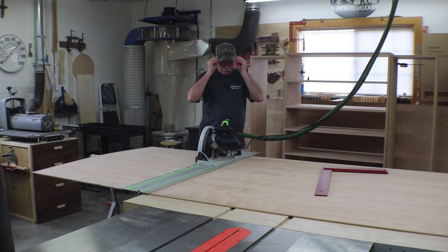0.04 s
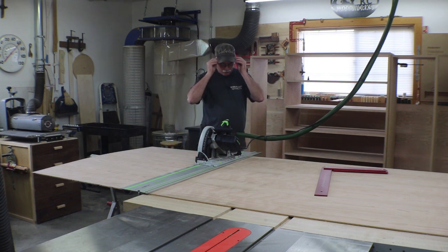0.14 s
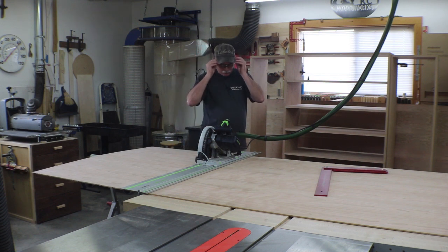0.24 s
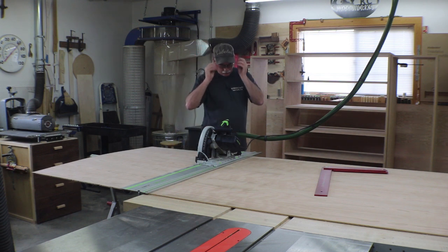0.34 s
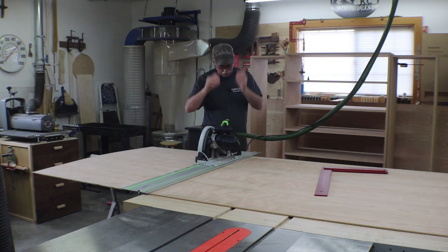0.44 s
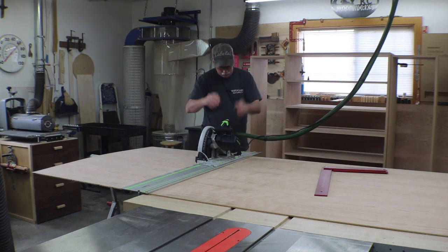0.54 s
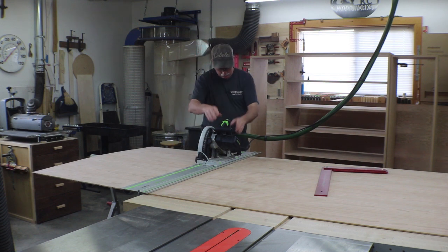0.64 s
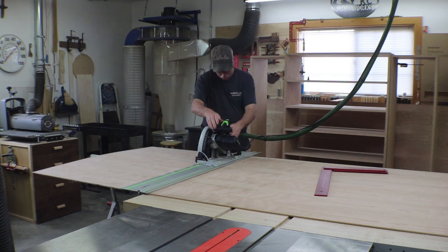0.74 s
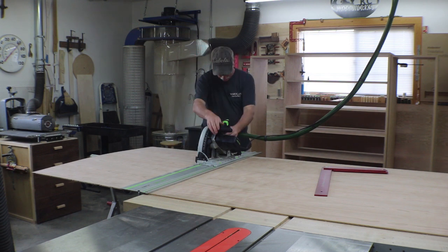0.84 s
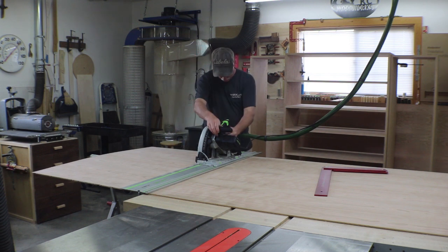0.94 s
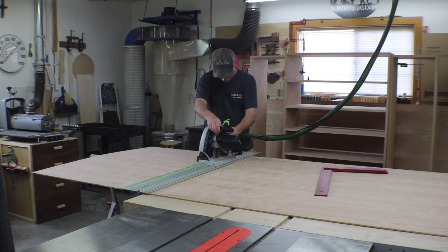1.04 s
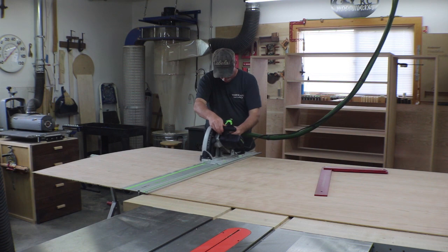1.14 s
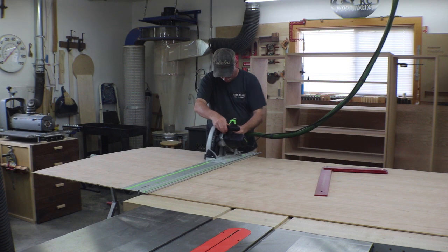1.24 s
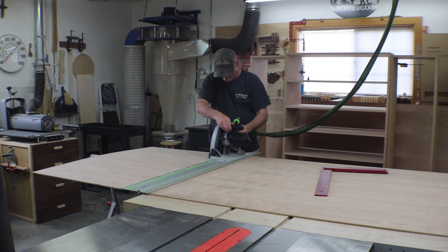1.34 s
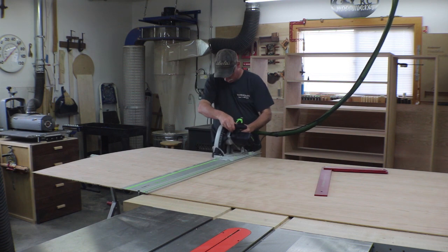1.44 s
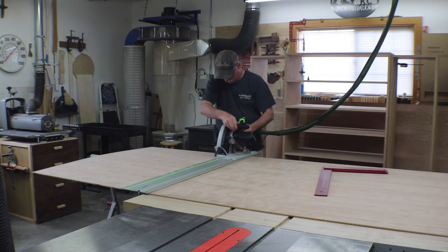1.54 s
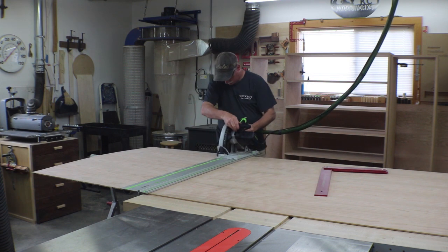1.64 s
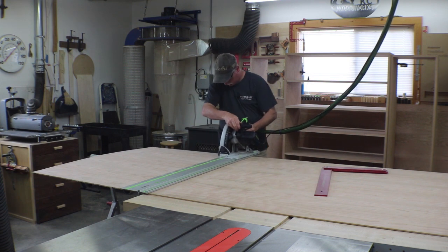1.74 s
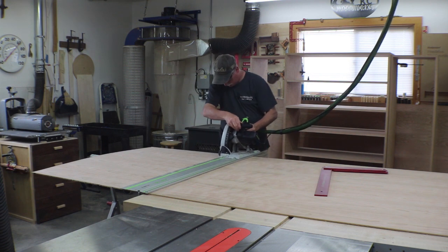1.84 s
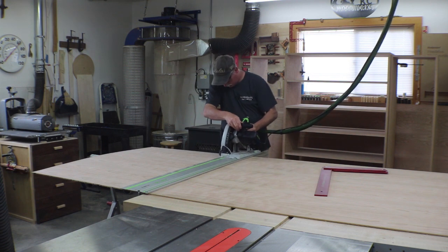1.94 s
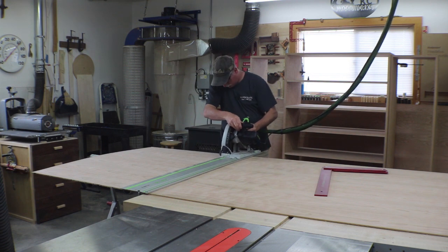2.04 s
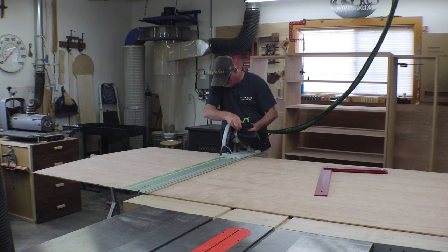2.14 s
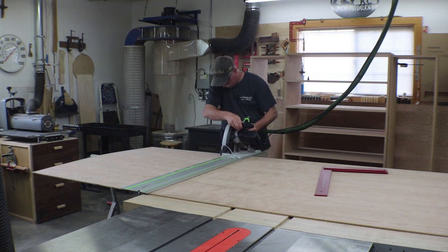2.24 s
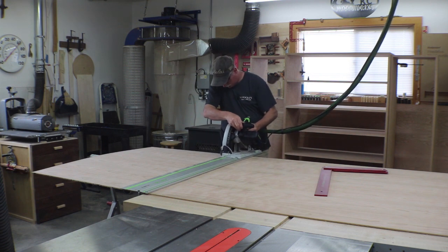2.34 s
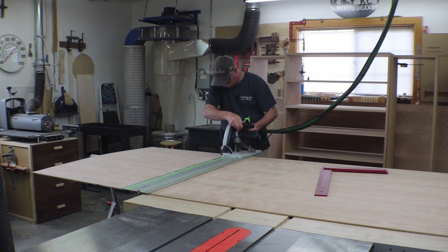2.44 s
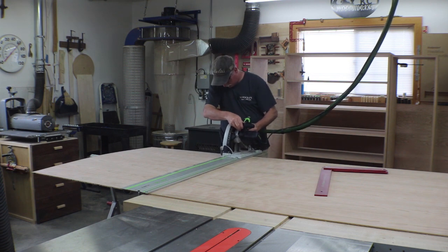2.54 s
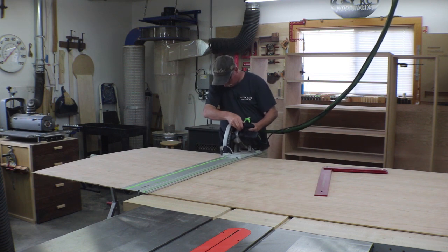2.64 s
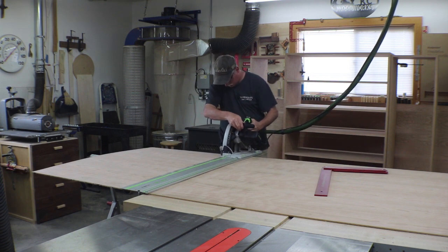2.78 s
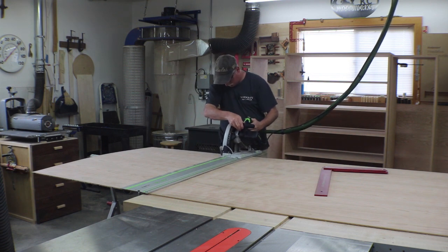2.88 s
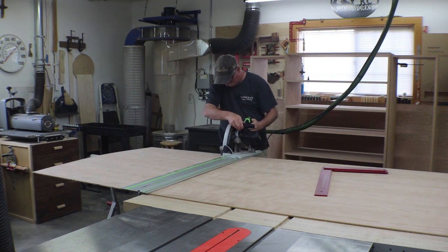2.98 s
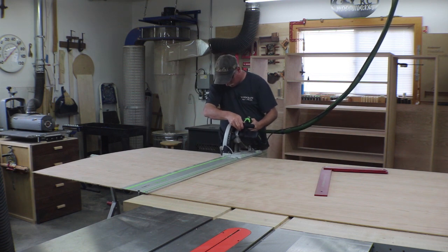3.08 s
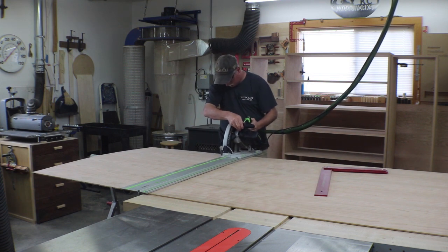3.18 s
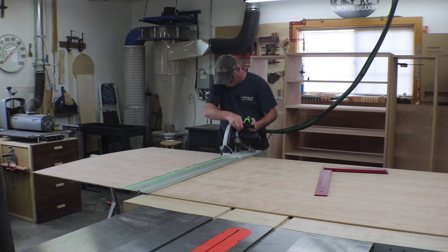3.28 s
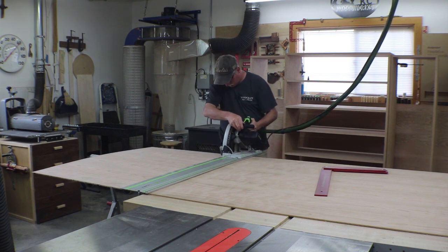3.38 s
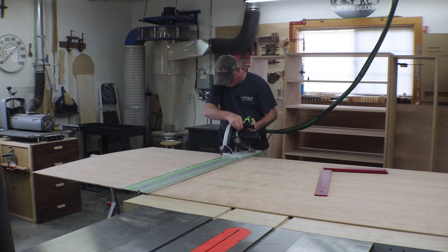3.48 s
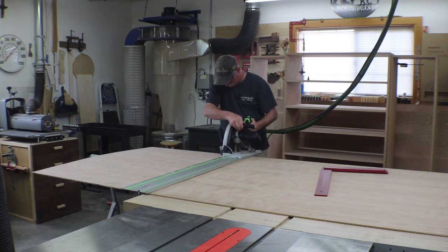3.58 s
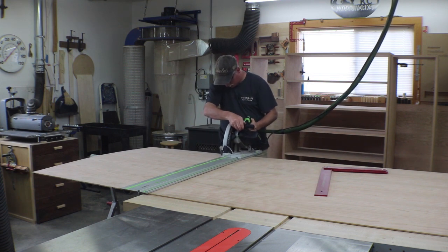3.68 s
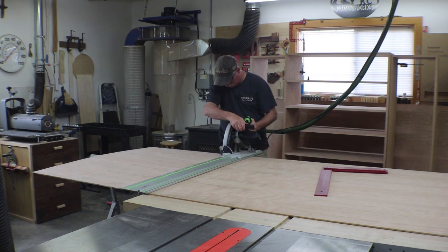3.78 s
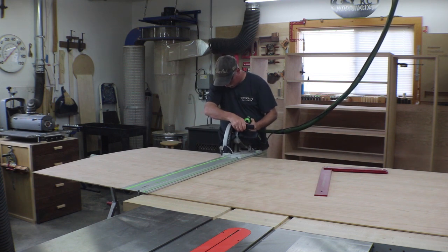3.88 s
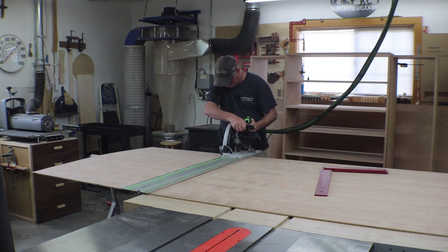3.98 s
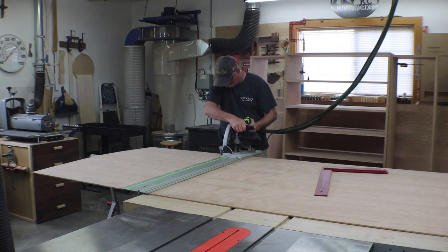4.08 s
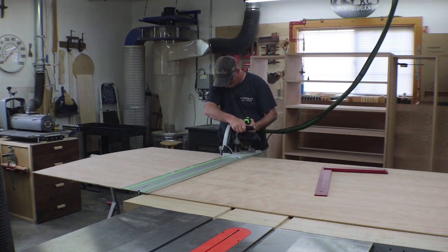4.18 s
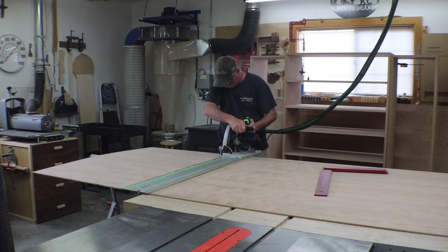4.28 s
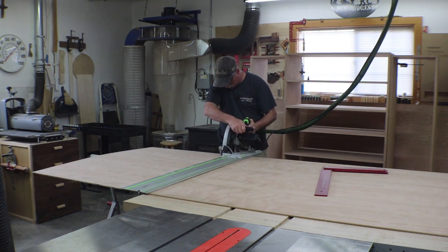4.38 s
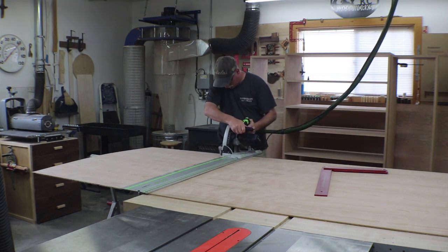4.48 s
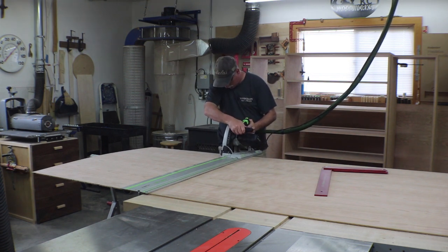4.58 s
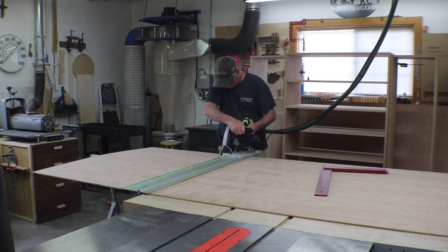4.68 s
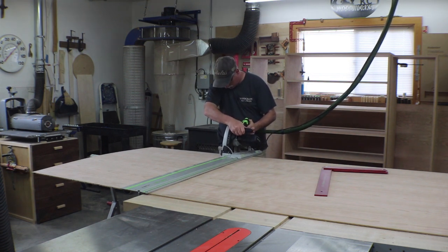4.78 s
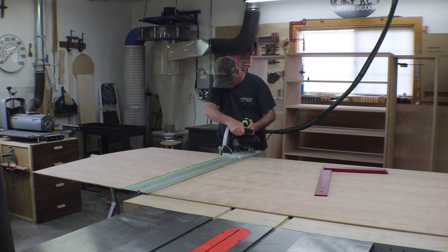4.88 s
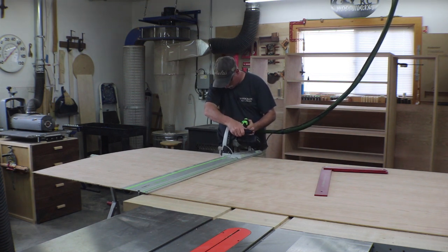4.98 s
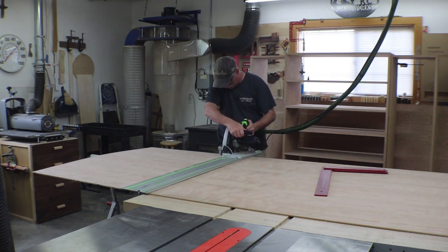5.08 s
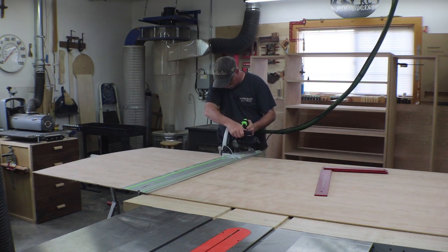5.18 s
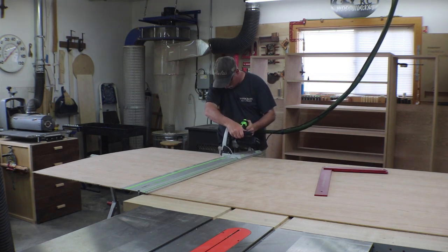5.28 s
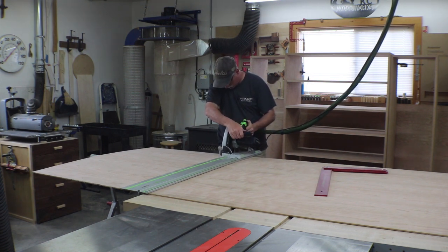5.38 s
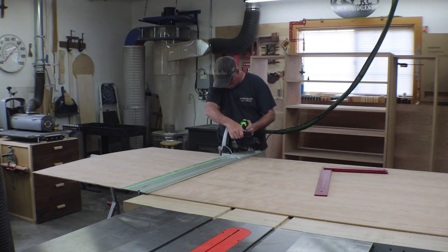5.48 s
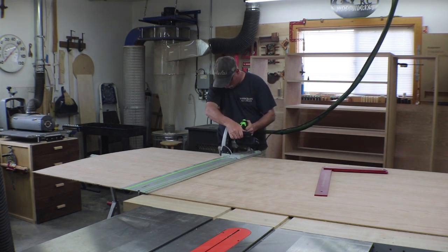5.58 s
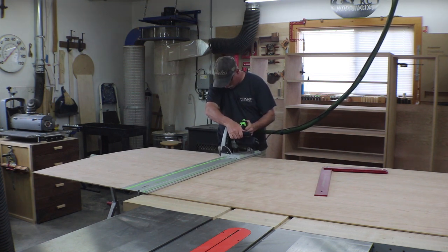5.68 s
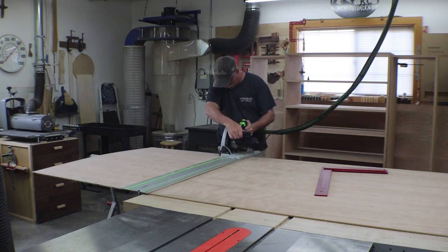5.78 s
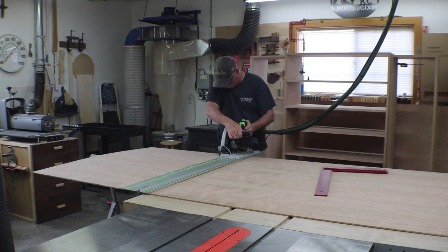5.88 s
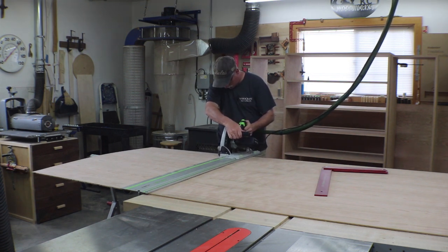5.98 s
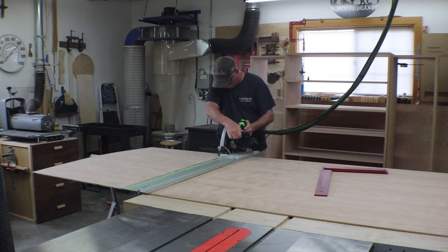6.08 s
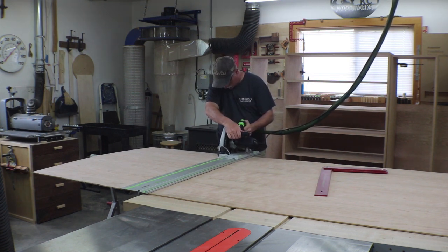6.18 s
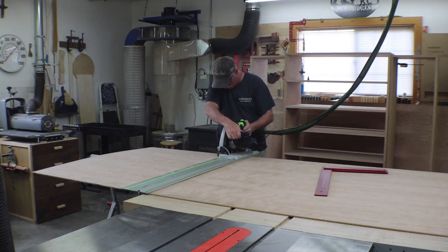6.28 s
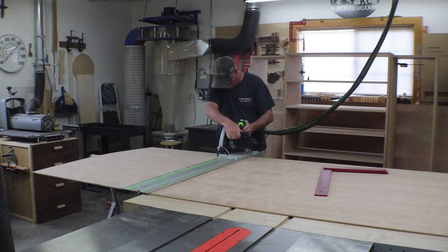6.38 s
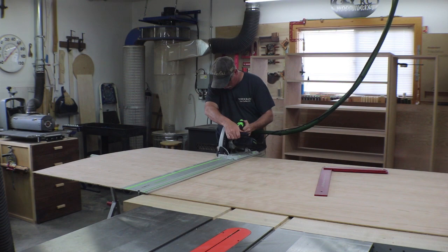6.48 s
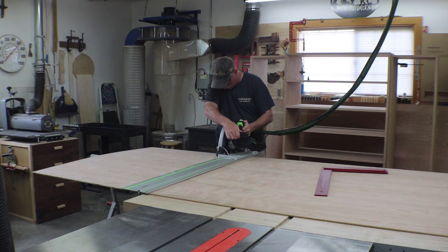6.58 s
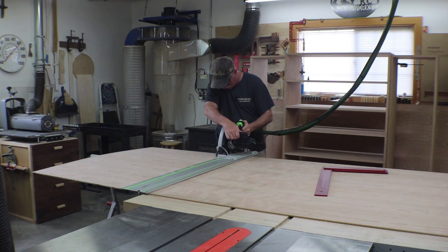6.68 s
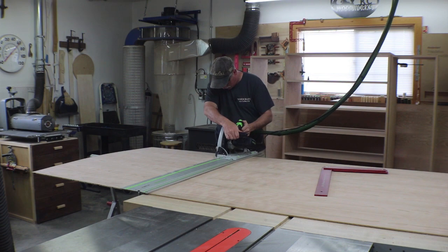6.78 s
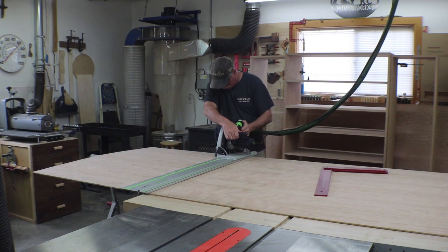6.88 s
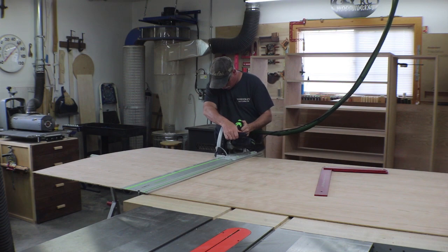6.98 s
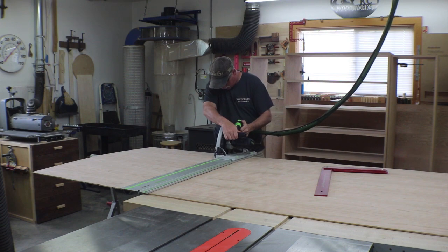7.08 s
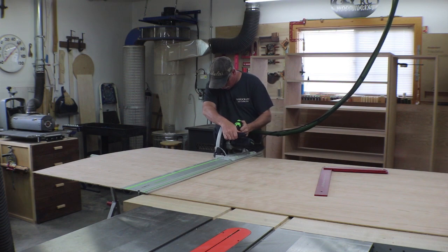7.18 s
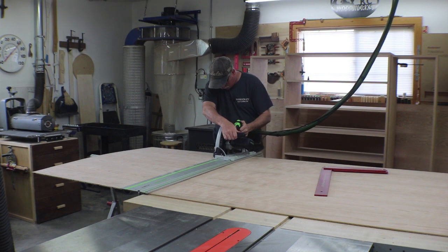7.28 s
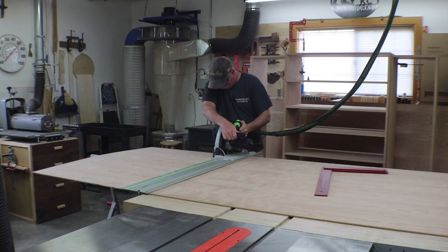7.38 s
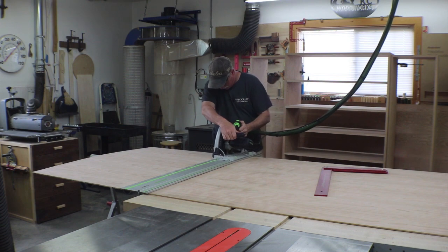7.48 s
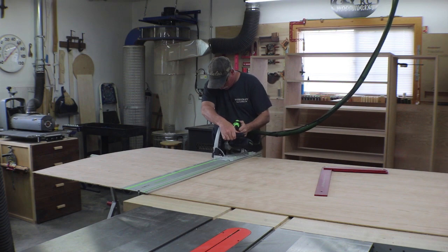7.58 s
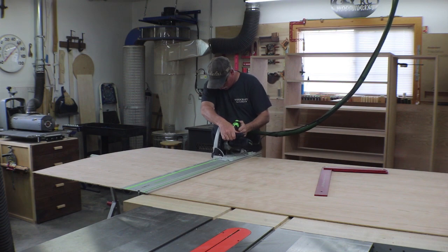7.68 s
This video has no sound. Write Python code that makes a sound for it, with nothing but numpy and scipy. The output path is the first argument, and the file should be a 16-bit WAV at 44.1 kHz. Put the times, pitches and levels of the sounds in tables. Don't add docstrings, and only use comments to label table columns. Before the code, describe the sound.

A tool base knocks and slides along a rail, a switch snaps, then a circular saw and dust extractor growl up into a loud steady whine.

```python
import sys
import numpy as np
from scipy import signal
from scipy.fft import rfft, irfft, next_fast_len
from scipy.io import wavfile
from scipy.ndimage import uniform_filter1d, map_coordinates

SR = 44100
rng = np.random.default_rng(int(sys.argv[2]) if len(sys.argv) > 2 else 0)


def generate_wav(signal):
    frames = np.transpose(np.atleast_2d(signal))
    scaled = np.clip(frames, -1, 1) * 32767
    pcm = np.round(scaled).astype(np.int16)
    wavfile.write(sys.argv[1], SR, pcm)


def invert_db(x):
    u = np.asarray(x, float) / 20
    return 10 ** u


N = 340893
T = np.arange(N) / SR

PULSE_HZ = 120.5
SAW_HZ, FAN_HZ = 357.2, 425.8
CUT_IN_S = 3.728
# start_s, peak_db
JOLTS = [(3.4815, -36), (3.4877, -30), (3.4985, -29), (3.513, -41), (3.530, -27), (3.546, -40),
         (3.5621, -18), (3.579, -25), (3.597, -20), (3.616, -29), (3.6344, -30), (3.6514, -28),
         (3.6694, -37), (3.6943, -22), (3.7013, -15), (3.728, -10.5)]


def unit(x):
    return x / np.sqrt(np.mean(x ** 2) + 1e-20)


def along(points, hz):
    f, v = np.transpose(points)
    return np.interp(np.log(hz + 1), np.log(f + 1), v)


def curves(rows, outside=None):
    s, *cols = np.transpose(rows)
    return [np.interp(T, s, c, left=outside) for c in cols]


def ramp(start, lasts):
    return np.clip((T - start) / lasts, 0, 1)


def wobble(rate):
    return map_coordinates(rng.standard_normal(int(N * rate / SR) + 4), [T * rate])


def filtered(x, response):
    m = next_fast_len(N + SR // 2)
    return irfft(rfft(x, m) * response(np.fft.rfftfreq(m, 1 / SR)), m)[..., :N]


def colour(points):
    return lambda hz: invert_db(along(points, hz))


def resonances(modes):
    def response(f):
        total = 0
        for k, (c, w, db) in enumerate(modes):
            damping = 1j * f * w
            total = total + (-1) ** k * invert_db(db) * damping / (c * c - f * f + damping)
        return total
    return response


def noise(response):
    return unit(filtered(rng.standard_normal(N), response))


def grit(spectrum, grain_db, patchy_db):
    grains = rng.standard_normal(N) * invert_db(grain_db * rng.exponential(size=N))
    z = signal.stft(grains, nperseg=512)[2]
    field = uniform_filter1d(rng.standard_normal(z.shape), size=5, axis=0)
    field = uniform_filter1d(field, size=12, axis=1)
    patchy = signal.istft(z * invert_db(patchy_db * unit(field)), nperseg=512)[1][:N]
    return unit(filtered(patchy, colour(spectrum)))


def orders(turns, table, unsteady_db, rate):
    total = 0
    for k, db in table:
        level = invert_db(db + unsteady_db * wobble(rate))
        total = total + level * np.sqrt(2) * np.sin(2 * np.pi * (k * turns + rng.random()))
    return total


def ring(modes, t, scatter_db):
    total = 0
    for hz, db, t60 in modes:
        total = total + invert_db(db + rng.normal(0, scatter_db) - 60 * t / t60) * np.sin(2 * np.pi * hz * t)
    return total


def bursts(events, t60, rise):
    out, age = np.zeros(N + 2 * SR), np.arange(int(2 * min(t60, 1) * SR)) / SR
    for s, db in events:
        out[round(s * SR):][:len(age)] += invert_db(db - 60 * age / t60) * (1 - np.exp(-age / rise))
    return out[:N]


def hiss_floor():
    # hz, db per Hz
    floor_spectrum = [(15, -35), (25, -10), (269, -8), (316, -7.5), (403, -9.5), (981, -14), (1390, -13.5),
                      (2260, -15), (3390, -11.5), (15800, -13)]
    common, left, right = (grit(floor_spectrum, grain_db=-5, patchy_db=2.5) for _ in range(3))
    return invert_db(-57.5) * (1.03 * filtered(common, lambda hz: hz < 3000) + 0.84 * np.array([left, right]))


def shop(x):
    # hz, t60_s
    decay = [(150, 1), (1000, 0.24), (7000, 0.45), (14000, 0.11)]
    hz, t, z = signal.stft(rng.standard_normal(SR // 2), SR, nperseg=256)
    tail = signal.istft(z * invert_db(-60 * t / along(decay, hz)[:, None]), SR, nperseg=256)[1]
    delayed = np.pad(x, (400, 0))
    return signal.fftconvolve(delayed, tail / np.linalg.norm(tail))[:N]


def cloth():
    # hz, db per Hz
    fibres = [(3000, -28), (6000, -8), (12600, 0), (15800, -8)]
    # hz, width_hz, level_db
    hollow = [(2750, 1300, -2), (1800, 600, -6)]
    sleeve = invert_db(-58) * np.sin(np.pi * ramp(.822, .09) ** .6) * noise(colour(fibres))
    air = rng.standard_normal(N)
    brush = unit(filtered(air, lambda hz: resonances(hollow)(hz) ** 2))
    hiss = unit(filtered(air, colour(fibres)))
    puff = np.sin(np.pi * ramp(2.655, .09)) * (invert_db(-59) * brush + invert_db(-56) * hiss)
    return sleeve + puff


def ticks():
    # start_s, peak_db, ring_hz, ring_db, length_s
    snaps = [(0.009, -50, 2650, 12, .004), (.2632, -50, 2400, 9, .003), (.2635, -56, 4300, 6, .002),
             (.2945, -49, 2050, 9, .003), (3.1975, -49, 900, 6, .005), (3.199, -45, 1780, 9, .006),
             (3.236, -60, 3050, 14, .006), (3.242, -60, 3050, 15, .006), (3.252, -19, 1600, -9, 0.0091),
             (3.2535, -33, 3410, 6, .004), (3.254, -37, 1080, 6, .004), (3.2687, -31, 1780, 4, .008),
             (3.2737, -10.5, 7200, -3, 0.0038), (3.275, -24.5, 1090, 5.5, 0.0037),
             (3.2754, -11.5, 1740, -5, 0.0056), (3.2786, -24.5, 1730, 6, .004), (3.274, -27, 3230, 8, .004),
             (3.58, -34, 14000, -9, .004), (3.6345, -37, 14100, 1, .004), (3.707, -28, 1590, 7, .0087)]
    # hz, width_hz, level_db
    spring = [(7300, 800, 4), (6100, 900, -1), (4400, 700, -6), (1800, 400, -1)]
    out, t = np.zeros(N + SR), np.arange(SR // 3) / SR
    for s, db, hz, ring_db, length in snaps:
        snap = 0.66 * invert_db(-20 * t / length) * rng.standard_normal(len(t))
        hollow = ring([(hz, ring_db, 14 / hz + .003)], t, scatter_db=0)
        out[round(s * SR):][:len(t)] += invert_db(db) * (snap + hollow)
    thin = filtered(out[:N], lambda hz: 1j * hz / (1j * hz + 130))
    tail = bursts([(3.252, -53), (3.276, -47)], t60=0.6, rise=.004)
    return thin + tail * noise(resonances(spring))


def knocks():
    # start_s, peak_db, ring_hz, body_db, crack_db
    hits = [(.571, -51, 360, -12, 0), (.9675, -22, 340, -8, -8), (.9695, -8, 345, -7, -10),
            (.9811, -16, 345, -30, -14), (.9927, -20, 345, -30, -20), (1.017, -27, 700, -30, -12),
            (1.0313, -27, 700, -30, -12), (.988, -24, 160, -30, -20), (1.022, -28, 330, -30, -20),
            (1.077, -27, 700, -20, -10), (1.115, -29, 340, -30, -20), (1.225, -40, 760, -12, 4),
            (1.24, -31, 900, -10, 0), (1.2415, -33, 1420, -30, -20), (1.246, -28, 490, -30, -14),
            (1.243, -31, 150, -30, -20), (1.27, -36, 115, -30, -20), (1.545, -35, 70, -22, -9),
            (1.542, -33, 1560, -30, -20), (1.552, -34, 1560, -30, -20), (1.595, -30, 1630, -30, -20),
            (1.603, -35, 1600, -30, -20), (1.638, -35, 100, -30, -20), (1.665, -30, 474, -22, -14),
            (1.666, -35, 1600, -30, -20), (1.69, -35, 80, -30, -20), (1.775, -35, 110, -30, -20),
            (1.803, -33, 430, -14, -3), (1.8035, -31, 760, -30, -20), (1.822, -34, 440, -25, -14),
            (1.72, -37, 80, -30, -20), (1.83, -41, 70, -30, -20), (1.915, -40, 80, -30, -20),
            (2.4258, -40, 385, -16, -13), (2.4284, -34.5, 385, -34, -22), (2.444, -35, 360, -40, -26),
            (2.4523, -41, 360, -40, -26), (2.4606, -47, 360, -40, -26), (2.43, -48, 110, -40, -30)]
    # hz, level_db, t60_s
    body_modes = [(160, -8, 0.2), (400, -32, 0.062), (482, -14, 0.38), (704, -10, .2), (960, -20, 0.1),
                  (1260, -13, 0.4), (1663, -14, 0.15), (1760, -16, 0.3), (2010, -6, 0.067),
                  (2090, -19, 0.33)]
    # hz, db per Hz
    crack_spectrum = [(88, -34), (150, -4), (404, 1.5), (1400, -8.5), (1990, -6), (2370, -17), (4240, -22),
                      (4860, -34), (10600, -33.5), (15600, -59)]
    out, t = np.zeros(N + SR), np.arange(SR // 3) / SR
    for s, db, hz, body_db, _ in hits:
        body = invert_db(body_db) * ring(body_modes, t, scatter_db=1.5) * invert_db(-60 * t / .4)
        own = ring([(hz, -3, .045 + 11 / hz)], t, scatter_db=0)
        out[round(s * SR):][:len(t)] += invert_db(db - 1.5) * (body + own) * (1 - np.exp(-t / 0.00082))
    cracks = bursts([(s, db + crack_db) for s, db, *_, crack_db in hits], t60=0.057, rise=0.001)
    return out[:N] + cracks * noise(colour(crack_spectrum))


def slide():
    # start_s, speed_db
    push = [
        (.97, -18),
        (1.13, -4),
        (1.32, -0.5),
        (1.6, -5.5),
        (1.79, -11.5),
        (2.05, -24.5),
        (2.5, -29),
    ]
    # start_s, length_s, scrape_db, fine_db, rumble_db
    rubs = [(-.1, 0.23, -66, -66, -75), (0.527, 0.42, -57, -60.5, -64), (0.777, 0.41, -71, -72, -57),
            (1.49, 0.61, -59, -62, -56), (2.648, 0.12, -68, -58.5, -64), (2.68, 0.041, -72, -66, -70),
            (2.687, .55, -61, -67, -67), (3.19, 0.28, -54.5, -57, -69)]
    # hz, db per Hz
    rumble_spectrum = [(15, -39), (25, 12), (38, -7), (91, 3.5), (198, -1), (250, 2), (320, -6),
                       (550, -120)]
    fine_spectrum = [(1470, -16), (2300, -6), (2800, -2.5), (4360, -8.5), (5490, -17), (6160, -16),
                     (14600, -17.5), (15800, -13.5)]
    scrape_spectrum = [(88, -41), (150, -9), (263, -12), (298, 1.5), (476, 3), (593, -3.5), (689, -2),
                       (1160, -3), (1550, -1), (2070, -5.5), (4000, -25), (5200, -26), (8800, -120)]
    # hz, width_hz, level_db
    rail_modes = [(1740, 130, 1.5), (5500, 250, 8), (715, 60, -2), (1570, 90, 3)]
    overhang_modes = [(1930, 130, -3), (704, 90, 4.5)]

    speed_db = np.where(T < 2.5, curves(push, outside=-120)[0], -120)
    start, length, *levels = np.transpose(rubs)[..., None]
    swell = np.abs(np.sin(np.pi * ramp(start, length))) ** 0.57 * (T < start + length)
    scrape, fine, rumble = (np.sum(invert_db(db) * swell, axis=0) for db in levels)
    skid = bursts([(.9695, -39.5)], t60=0.57, rise=.01)

    rumble = (rumble + 0.37 * skid + invert_db(-56 + speed_db)) * invert_db(1.7 * wobble(25.1))
    rumble = rumble * grit(rumble_spectrum, grain_db=0.5, patchy_db=3.5)
    scrape = (scrape + skid + invert_db(-44 + 0.84 * speed_db)) * invert_db(.9 * wobble(35))
    scrape = scrape * grit(scrape_spectrum, grain_db=1.1, patchy_db=.9)
    fine = (fine + invert_db(-44 + 1.33 * speed_db)) * grit(fine_spectrum, grain_db=1.5, patchy_db=.6)

    landed = T > .96
    on_rail = 1.2 * ramp(.85, .65) * landed * (1 - ramp(2.3, .2)) * np.interp(T, [1.74, 1.84], [1, .35])
    overhang = (1 - ramp(1.25, .25)) * landed
    rail = filtered(scrape + fine, lambda f: np.abs(resonances(rail_modes)(f)))
    start_rail = filtered(scrape + fine, lambda f: np.abs(resonances(overhang_modes)(f)))
    return rumble + scrape + fine + on_rail * rail + overhang * start_rail


def fan_speed():
    # start_s, turns_hz
    shaft = [(3.728, 5), (4.2, 254), (4.28, 292), (4.41, 351), (4.52, 386), (4.63, 408.5), (4.76, 423.5),
             (4.84, 425.6), (4.97, 423.2), (5.38, 423.1), (5.52, 426.6), (5.75, 426.8), (5.88, 424.6),
             (6.5, 425.9), (6.62, 424.4), (6.9, 425.7), (7.48, 424.8), (7.65, 425.8)]
    return uniform_filter1d(curves(shaft)[0], size=3500, mode="nearest")


def buzz():
    multiples = (1, 2, 3, 4, 5, 7)
    # inrush_db, fade_db_per_s, share lost as the soft start eases, opposing saw hum_db
    levels = [(-34.5, 1, 0, -46), (-32, 4, .7, -48), (-17.5, 15, 1, -30.5), (-20.5, 8, .9, -33),
              (-30.5, .5, 0, -49), (-20, 10, .3, -56)]
    # how long the easing lasts, s
    ease_s = [.22, .22, .22, .62, .22, .22]
    # when it ends as a motor stops labouring, s
    drop_s = [5.5, 4.7, 4.67, 5.46, 5.46, 4.8]
    # start_s, third multiple_db, others_db
    creep = [(3.38, -40, -40), (3.44, -25, -19), (3.5, -11, -8), (3.55, -4, -5), (3.595, -8, -10),
             (3.612, -14, -10), (3.625, 3, -4), (3.68, 3, -2), (3.705, 7, 2), (3.74, -2, -2), (3.8, 0, 0)]
    # multiple, level_db, extra fade_db_per_s
    upper = [(6, -20, -12), (8, -18, 5), (9, -5, -3), (10, -16, -3), (11, -7, -2), (12, -19, -6),
             (13, -21, -9), (14, -14, 5), (15, -22, -8), (16, -18, 0), (17, -19, -4), (18, -16, 2)]
    # start_s, level_db
    stir_level = [(3.4, -75), (3.425, -53), (3.46, -52), (3.49, -75)]

    age, turns = np.clip(T - 3.748, 0, None), PULSE_HZ * T
    inrush_db, fade, lost, hum_db = np.transpose(levels)[..., None]
    eased = 1 - lost * ramp(4.17, np.array(ease_s)[:, None])
    inrush = invert_db(inrush_db - fade * age) * np.clip(age / .022, 0, 1) * eased
    third_db, others_db = curves(creep, outside=-120)
    is_third = np.arange(6)[:, None] == 2
    hum = invert_db(hum_db + np.where(is_third, third_db, others_db) + wobble(30))
    sizes = (inrush - hum) * np.clip((np.array(drop_s)[:, None] - T) / .06, 0, 1)

    low = sum(size * orders(turns, [(k, 0)], unsteady_db=.8, rate=12) for k, size in zip(multiples, sizes))
    high = 0
    for k, db, extra_fade in upper:
        high = high + invert_db(-extra_fade * age) * orders(turns, [(k, db)], unsteady_db=.9, rate=10)
    stir_db = np.interp(T, *np.transpose(stir_level), left=-120, right=-120)
    return low + sizes[-1] * high + invert_db(stir_db) * np.sin(2 * np.pi * 1590 * T)


def extractor_whine():
    fan_orders = [(1, -31.5), (2, -42), (4, -39), (8, -45), (14, -60), (15, -46), (16, -42), (20, -46)]
    fan_power = [13, 4.8, 1.5, 4, -6, 2, 4, 2]
    # hz, level_db
    housing = [(6400, -60), (8200, -42), (8750, -20), (10000, -30), (10800, -26), (11600, -39),
               (12300, -29), (12800, -28.5)]
    # start_s, level_db
    whine_swells = [(4.6, 0), (4.86, -6), (5.04, 4), (5.15, -2), (5.24, -10), (5.35, 0), (5.41, -9), (5.52, -1),
                    (5.77, -10), (5.9, -1), (6.33, 1), (6.6, -2), (7.3, 0), (7.5, -8), (7.61, 0), (7.73, -5)]
    shaft_hz = fan_speed()
    turns = np.cumsum(shaft_hz + .3 * wobble(28)) / SR
    fan = 0
    for tone, power in zip(fan_orders, fan_power):
        fan = fan + (shaft_hz / shaft_hz[-1]) ** power * orders(turns, [tone], unsteady_db=1.3, rate=9)
    strain = invert_db(.014 * SR * np.gradient(shaft_hz))
    bars = invert_db(along(housing, 30 * shaft_hz) + curves(whine_swells)[0])
    bars = bars * orders(turns, [(30, -3)], unsteady_db=1.5, rate=16)
    beat = 2 * invert_db(-11 - 4 * (T > 5.5)) * np.cos(2 * np.pi * PULSE_HZ * T)
    return ramp(4.12, 0.17) * (strain * fan + bars * (1 + beat))


def saw_tones():
    saw_orders = [(1, -48), (3, -41), (4, -43), (5, -42), (6, -38), (12, -50), (30, -43)]
    # start_s, level_db
    settled = [
        (5.2, -30),
        (5.7, 0),
        (7.73, 0),
    ]
    turns = np.cumsum(SAW_HZ + 0.216 * wobble(20)) / SR
    return invert_db(curves(settled, outside=-120)[0]) * orders(turns, saw_orders, unsteady_db=2.2, rate=4)


def blade():
    steady_modes = [(1550, 10, -44), (2805, 12, -47), (3655, 12, -44), (4237, 14, -44), (4290, 12, -47),
                    (4340, 12, -46), (5120, 20, -51), (5243, 20, -49), (5599, 20, -48), (5798, 20, -47),
                    (7488, 25, -44), (8333, 25, -42), (9711, 30, -43), (10950, 20, -46), (13765, 40, -45),
                    (8480, 90, -39), (14480, 50, -46), (12200, 30, -47)]
    early_modes = [(3090, 70, -39), (3230, 110, -37), (8800, 300, -38)]
    late_modes = [(2439, 16, -42), (3200, 200, -39), (3472, 14, -40), (4400, 80, -44), (5130, 30, -49),
                  (6380, 90, -43)]
    drive = 1.75 * ramp(4.2, 1.2) * rng.standard_normal(N)

    def sing(modes):
        return filtered(drive, resonances([(c, w, db - 10 * np.log10(w)) for c, w, db in modes]))

    moved = ramp(6.2, .6) * np.pi / 2
    singing = sing(steady_modes) + np.cos(moved) * sing(early_modes) + np.sin(moved) * sing(late_modes)
    return np.sqrt(SR / np.pi) * singing


def speeding_up(slow, fast, start=3.99, lasts=0.72):
    turn = ramp(start, lasts) * np.pi / 2
    rough, smooth = grit(slow, grain_db=1.55, patchy_db=2.0), grit(fast, grain_db=0.0, patchy_db=0.2)
    return np.cos(turn) * rough + np.sin(turn) * smooth


def tub_drumming(load, fan):
    # hz, db per Hz
    duct = [(15, -30), (30, -8.5), (87, 1.5), (330, 3.5), (430, 2.5), (730, -120)]
    level = invert_db(-11) * fan ** 7 + invert_db(-9) * np.clip(1 - 5 * fan, 0, 1)
    return load * level * invert_db(0.4 * wobble(23)) * grit(duct, grain_db=0.5, patchy_db=-0.5)


def air_hiss(load, kick, fan):
    # hz, db per Hz
    slow = [(300, -55), (2710, -28), (4600, -5.5), (5170, -19), (5820, -12), (9250, -4.5), (9800, -10.5),
            (12500, -20), (14200, -21), (15600, -27)]
    fast = [(2710, -43), (4600, -11), (5880, -3.5), (6130, -5), (6280, 0.5), (6600, -1), (7070, 0.5),
            (8360, 1.5), (9000, 0.5), (9700, -3.5), (10300, -5.5), (11300, -6.5), (12300, -5.5),
            (12900, -8), (13300, 2), (14000, -4), (14700, -8), (15050, -0.5), (15780, -14)]
    level = load * (invert_db(2.5) * fan ** 1.96 + invert_db(-20) * (1 - fan)) + invert_db(-13) * kick
    armature = 1 + 0.09 * np.cos(2 * np.pi * SAW_HZ * T)
    return armature * level * speeding_up(slow, fast, 4.05, 0.8)


def gear_whirr(load, jolts, kick):
    # hz, db per Hz
    slow = [(100, -60), (1290, -25), (2200, 1), (2520, -10.5), (2940, -6), (3320, -6.5), (3970, -5.5),
            (4240, -11.5), (5120, -18), (5600, -14), (7280, -27), (12300, -120)]
    fast = [(25, -43), (250, -13), (1240, -10), (2100, 1), (2210, -25), (2290, -12), (2480, -1),
            (2680, -3.5), (3200, 2), (3600, -1.5), (3850, -5), (4180, -2), (4400, -21), (4540, -5),
            (5600, -21), (7280, -9), (12300, -120)]
    jolt_colour = [(1800, -30), (2400, -2), (3400, -2), (4300, 2), (4700, -18), (9000, -26), (15000, -40)]
    slack_db = np.where(T < CUT_IN_S, -3.5 - 54 * (CUT_IN_S - T), 0)
    mesh = load * invert_db(-3 + slack_db + 0.053 * wobble(13)) + invert_db(-6) * kick
    catches = invert_db(-10.5) * bursts(JOLTS, t60=0.028, rise=.0008) * noise(colour(jolt_colour))
    return (mesh + 0.12 * jolts) * speeding_up(slow, fast) + catches


def casing_roar(load, jolts):
    # hz, db per Hz
    slow = [(30, -60), (120, -34), (250, -25), (400, -9), (700, -3.5), (1000, -4.5), (1400, 1), (1700, -2),
            (2100, -5), (2400, -25), (3400, -20), (5700, -120)]
    fast = [(30, -55), (120, -22), (250, -16), (400, -2.5), (600, -3.5), (1000, -7), (1300, -3.5),
            (1850, -4), (2200, -5.5), (2600, -17), (3400, -41), (5700, -120)]
    thud = bursts([(CUT_IN_S, -11.5)], t60=.3, rise=0.0043)
    level = load * invert_db(0.44 * wobble(7.1)) + thud + invert_db(-8) * jolts
    return level * speeding_up(slow, fast)


def roar():
    # start_s, level_db
    effort = [(3.38, -69), (3.466, -45), (3.534, -33.5), (3.672, -30), (3.73, -29), (3.98, -22.5),
              (4.32, -21), (4.71, -20), (4.8, -21.5), (5.05, -23.5), (5.25, -21.5), (5.4, -23), (7.73, -22)]
    load = invert_db(curves(effort, outside=-120)[0] + .4 * wobble(4))
    jolts = bursts(JOLTS, t60=0.065, rise=0.0012)
    kick = bursts([(CUT_IN_S, -15.5)], t60=0.77, rise=0.0083)
    fan = fan_speed() / FAN_HZ
    labour = np.interp(T, [3.4, 4, 4.7], [.6, .4, 0])
    beat = 2 * np.pi * PULSE_HZ * T
    pulse = 1 + labour * (0.18 * np.cos(beat) + 0.19 * np.cos(2 * beat))
    driven = pulse * (casing_roar(load, jolts) + gear_whirr(load, jolts, kick))
    return driven + air_hiss(load, kick, fan) + tub_drumming(load, fan)


def scene():
    hits = knocks() + ticks()
    motors = roar() + blade()
    handling = hits + invert_db(-17.0) * shop(hits) + slide() + cloth()
    running = 0.83 * motors + invert_db(-15) * shop(motors) + buzz() + extractor_whine() + saw_tones()
    return handling + running + hiss_floor()


def treble_fills(x):
    hz, t, z = signal.stft(x, SR, nperseg=512)
    draws = rng.random((17, 3))
    starts = 4.6 + (np.arange(len(draws)) + draws[:, 0]) / 5.5
    lows = np.interp(draws[:, 1], [0, 1], (4200, 13600))
    widths = np.interp(draws[:, 2], [0, 1], (1100, 2400))
    fill = 0
    for s, low, width in zip(starts, lows, widths):
        band = (hz > low) & (hz < low + width)
        fill = fill + band[:, None] * np.cos(np.clip((t - s) / .034, -.5, .5) * np.pi)
    scrambled = np.abs(z) * np.exp(2j * np.pi * rng.random(z.shape))
    kept = np.sqrt(1 - np.clip(fill, 0, 1) ** 2) * z
    return signal.istft(kept + 1.46 * fill * scrambled, SR, nperseg=512)[1][:, :N]


def band_limit(x):
    return signal.sosfilt(signal.butter(12, 16420, fs=SR, output="sos"), x)


def record(dry):
    held = dry / (1 + np.abs(dry / .66) ** 6) ** (1 / 6)
    mixed = treble_fills(held)
    finished = filtered(mixed, lambda hz: (hz < 15750) / np.sqrt(1 + (32 / (hz + 1)) ** 4))
    return band_limit(finished)


dry = scene()
out = record(dry)
generate_wav(out)
```